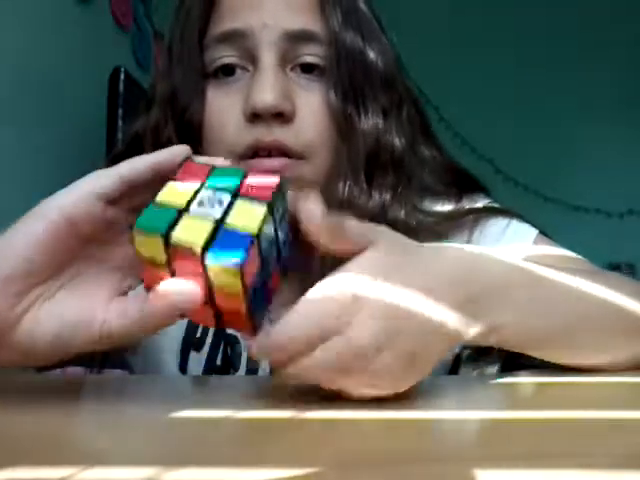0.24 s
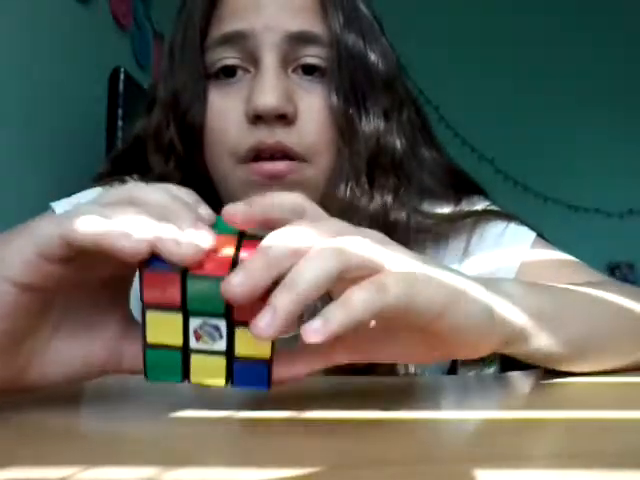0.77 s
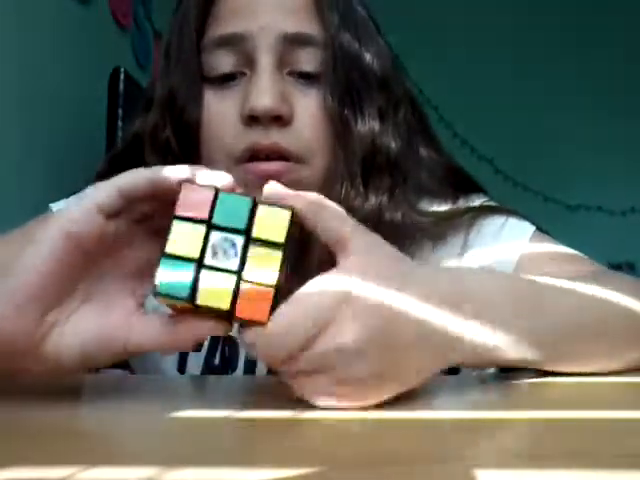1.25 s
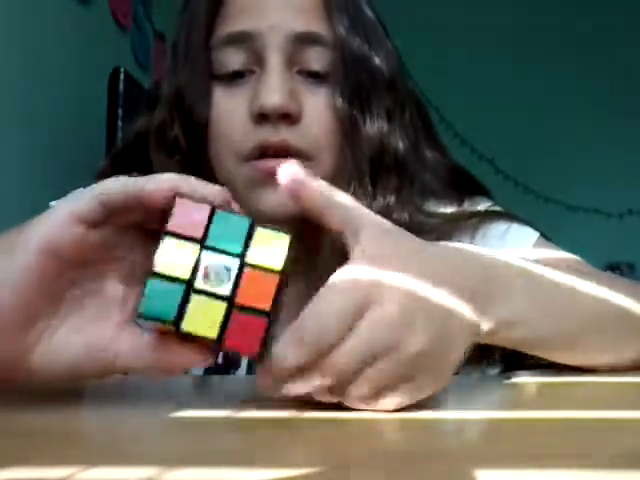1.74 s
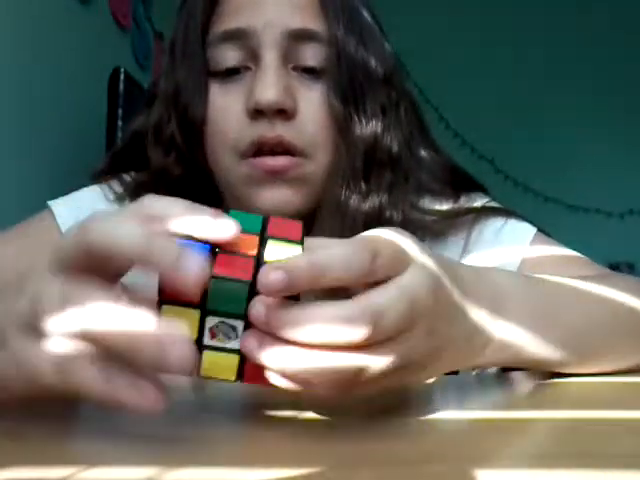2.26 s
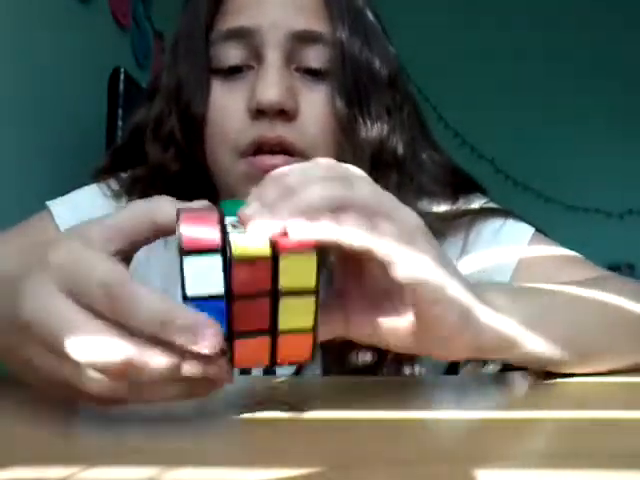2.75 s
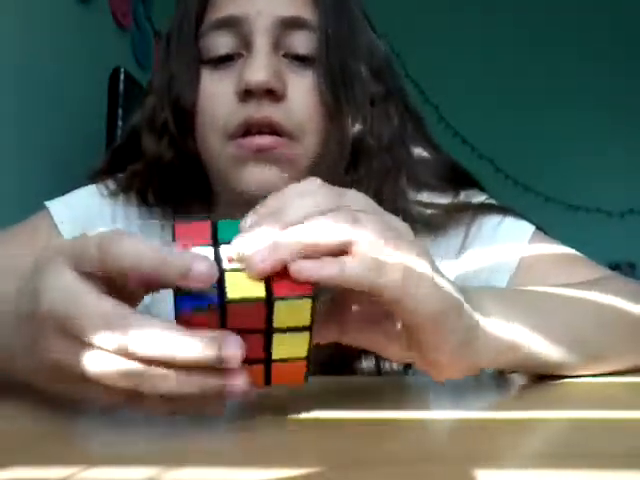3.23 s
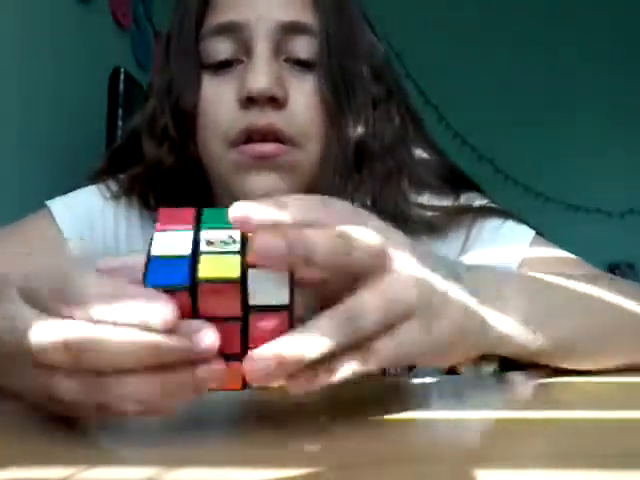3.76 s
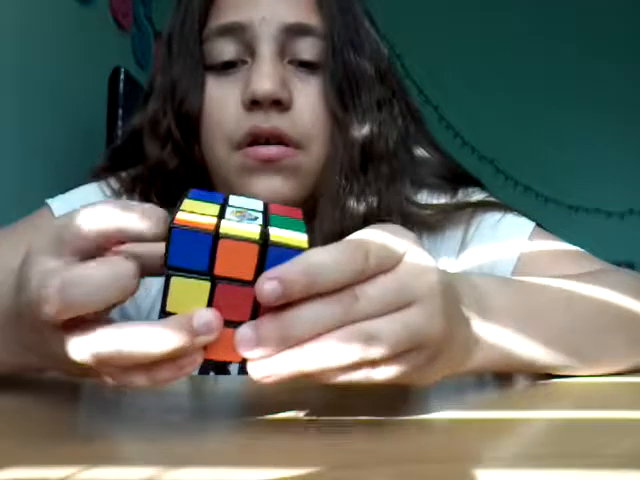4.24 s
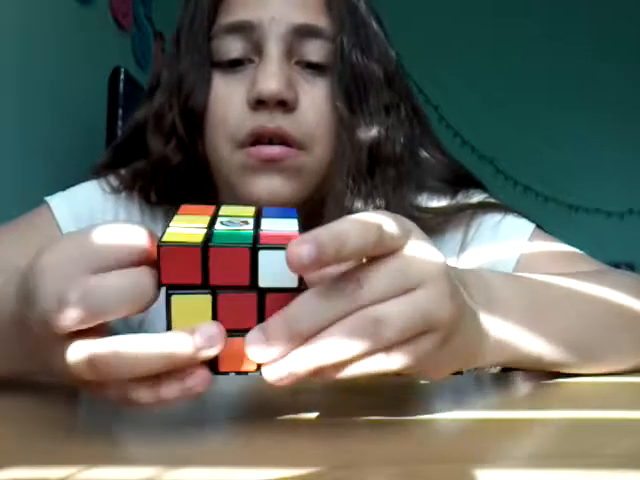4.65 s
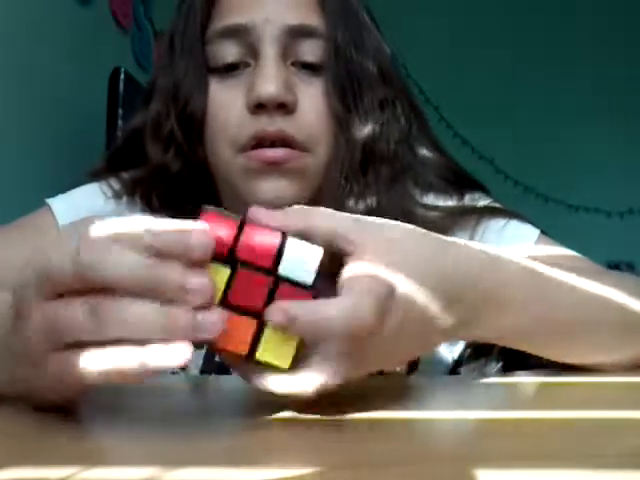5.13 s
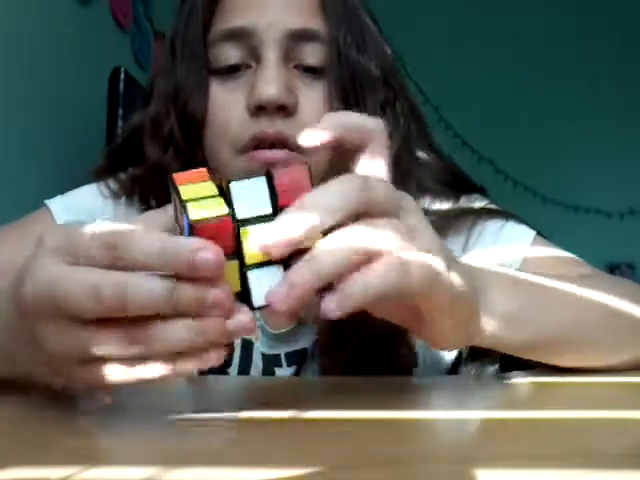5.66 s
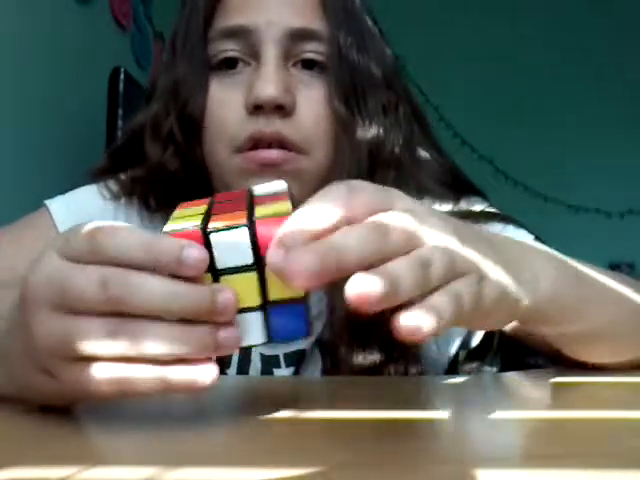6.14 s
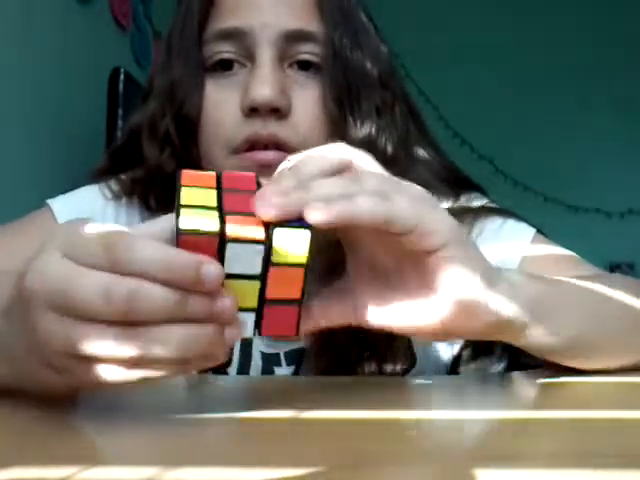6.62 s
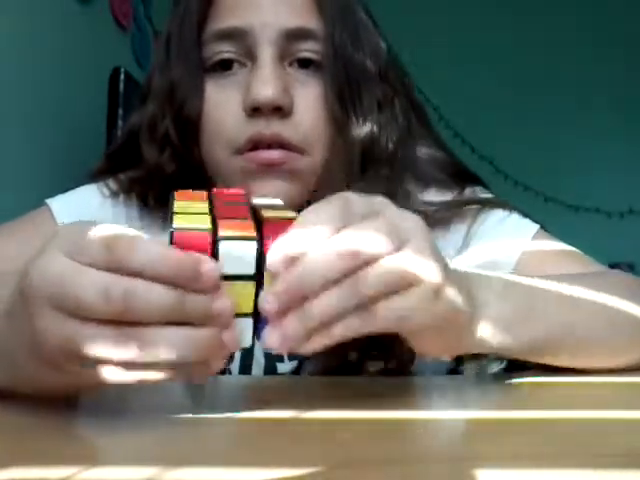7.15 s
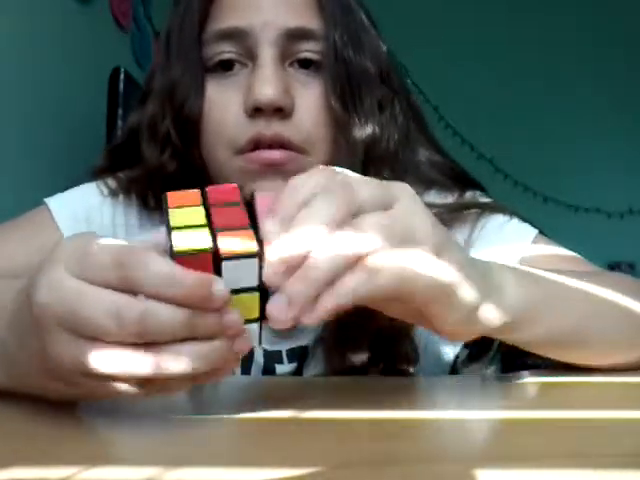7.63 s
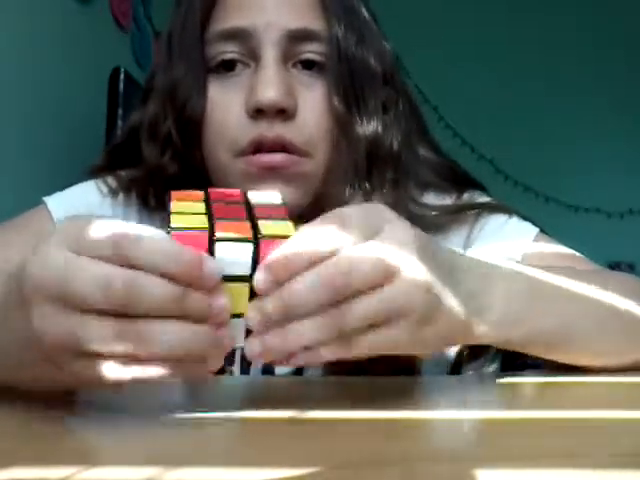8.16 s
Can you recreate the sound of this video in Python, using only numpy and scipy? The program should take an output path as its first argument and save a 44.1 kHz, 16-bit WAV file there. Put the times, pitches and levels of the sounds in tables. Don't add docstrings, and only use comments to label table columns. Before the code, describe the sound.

Close stereo microphone in a bare, lightly echoing room. A stiff plastic puzzle cube is turned by hand: brief dry scrapes end in bright cracks and hollow knocks, clustered irregularly with quiet gaps of tiny ticks and finger touches. A table thud comes early on, and one far louder clack lands at about five and a half seconds. Soft hum and hiss underneath.

```python
import sys
import numpy as np
from scipy import signal
from scipy.fft import rfft, irfft, next_fast_len
from scipy.io import wavfile
from scipy.ndimage import uniform_filter1d, minimum_filter1d, map_coordinates

SR = 44100
rng = np.random.default_rng(int(sys.argv[2]) if len(sys.argv) > 2 else 0)


def put_to_file(sound):
    columns = np.atleast_2d(sound).T
    safe = np.clip(columns, -1, 1)
    whole_steps = np.round(safe * 32767)
    wavfile.write(sys.argv[1], SR, whole_steps.astype(np.int16))


def gain_from_decibels(decibels):
    exponent = np.asarray(decibels, float) / 20
    return 10 ** exponent


N = 369999


def unit(x):
    return x / np.sqrt(np.mean(x ** 2) + 1e-20)


def along(points, hz):
    point_hz, value = np.transpose(points)
    return np.interp(np.log(hz + 1), np.log(point_hz + 1), value)


def filtered(x, response):
    size = next_fast_len(N + SR // 2)
    spectrum = rfft(x, size) * response(np.fft.rfftfreq(size, 1 / SR))
    return irfft(spectrum, size)[..., :N]


def causal(points):
    def response(hz):
        cepstrum = irfft(np.log(gain_from_decibels(along(points, hz))))
        half = len(cepstrum) // 2
        cepstrum[1:half] *= 2
        cepstrum[half + 1:] = 0
        log_response = rfft(cepstrum)
        return unit(np.abs(np.exp(log_response))) * np.exp(1j * log_response.imag)
    return response


def resonant(modes):
    def response(f):
        total = 0
        for k, (hz, width, db) in enumerate(modes):
            mode = 1j * f * width / (hz * hz - f * f + 1j * f * width)
            total = total + (-1) ** k * gain_from_decibels(db) * mode
        return total
    return response


def pair(shape, alike):
    a, b = rng.standard_normal((2, *shape))
    alike = np.clip(alike, 0, 1)
    return np.array([a, -alike * a + np.sqrt(1 - alike ** 2) * b])


def narrow(hz, width):
    return unit(filtered(rng.standard_normal(N), lambda f: np.exp(-((f - hz) / width) ** 2)))


# (time [s], crack [dB], hollow knock over the crack [dB], left over right [dB], decay T60 [s])
SEAT_SNAPS = [(0.1583, -23, -12, -8, 0.008), (0.8322, -22.5, -3.5, -3.5, 0.0091),
              (1.1391, -16.5, -3.5, -1, 0.045), (1.1439, -13, -1, -10, 0.0045),
              (1.2592, -23, -8, -6.5, 0.021), (1.2953, -17, 1.5, -2.5, 0.013),
              (1.2997, -14, -4, -9.5, 0.0073), (1.5234, -17.5, -9, 3.5, 0.012),
              (1.5471, -14.5, -1.5, 1, .016), (2.7533, -21.5, -6, 2, .007), (3.6489, -19, -10.5, -1, 0.013),
              (3.6601, -17.5, -2.5, -9, 0.012), (4.2188, -18, -3, 0.5, 0.031),
              (4.231, -11.5, -9, -7, 0.017), (4.2375, -17, -1.5, 1.5, 0.023),
              (4.6716, -20, -11, -5.5, 0.025), (4.6803, -15, 0.5, -6.5, 0.017),
              (5.5208, -22.5, -7, 0.5, 0.014), (5.5378, -9, -4.5, 1, 0.018), (5.5451, 1.5, -10, -3.5, .021),
              (6.5423, -29, -21, -9, .01), (6.5947, -16.5, -4, -3.5, 0.021), (7.0989, -28, -6, 3.5, 0.01),
              (8.323, -9.5, -11, -1.5, 0.01)]
# (time [s], crack [dB], knock over the crack [dB])
CATCH_SNAPS = [(0.073, -33, -6), (0.1634, -27, 6), (1.104, -29.5, -7), (1.1079, -22.5, -2),
               (1.217, -36.5, 11), (1.2301, -30.5, 2), (1.2658, -25, -34), (1.2778, -22.5, 3),
               (1.3923, -34, -44), (1.484, -35, 4.5), (1.516, -31, -6), (2.1975, -31.5, 4),
               (2.6348, -31.5, 1), (2.7268, -35.5, 3), (2.741, -34.5, -4), (2.7603, -21, -7),
               (2.7659, -34, 2), (3.5765, -24, -6.5), (3.6661, -19, -2.5), (4.2443, -17, 1.5),
               (4.6079, -25.5, -6), (5.5274, -26, 3.5), (5.5565, -26.5, -6.5), (5.5705, -24, 1),
               (5.9519, -33.5, 1.5), (6.5677, -22.5, -16), (6.584, -29, -3), (6.604, -21.5, -14),
               (7.129, -28.5, -3.5), (8.344, -35.5, 6.5)]
# (time [s], crack [dB], knock over the crack [dB])
LOOSE_TICKS = [(0.3035, -48.5, 3), (0.405, -40, -4), (0.5111, -50, 4), (0.9944, -42.5, 2),
               (1.4022, -33, -10), (1.6333, -39.5, 2.5), (1.6634, -47.5, 8), (2.0576, -45, -2),
               (2.5954, -44, -6), (2.612, -48, -6), (3.3387, -45.5, -2), (3.5606, -32.5, 2.5),
               (3.6091, -32, -3), (3.7297, -39, -5), (3.9344, -40, -0.5), (4.1231, -39.5, -2.5),
               (4.2045, -36, -4.5), (4.5958, -36.5, -2.5), (4.9538, -38.5, -2), (5.1574, -48.5, 8.5),
               (5.2064, -37.5, -2), (5.2395, -40.5, 5.5), (5.4194, -46.5, -18), (5.9579, -38, 11),
               (5.9145, -44.5, -6), (6.2971, -41, -1.5), (6.746, -42, 4.5), (7.1446, -34, -8),
               (8.173, -35, -12), (8.1978, -38, 8)]
# (time [s], crack [dB])
FINGER_TOUCHES = [(0.339, -51.5), (2.289, -47.5), (2.4514, -53), (3.871, -49), (3.924, -53.5), (4.536, -51),
                  (5.008, -52.5), (5.8531, -47), (7.2113, -44), (7.7286, -55), (7.8523, -66), (8.155, -60)]


def contacts():
    catch_t60_s, tick_t60_s = 0.011, 0.02
    chatter_db, chatter_spread_db = 1.5, 6
    tick_knock_db, knock_scatter_db, touch_knock_db = 4.5, 6, -0.5
    cube_pan_db, pan_scatter_db = -3.5, -2

    light = []
    for (s, rise, db), chances in zip(TURN_STROKES, rng.uniform(size=(len(TURN_STROKES), 3, 2))):
        for place, strength in chances:
            at = max(s - rise + place * (rise + TURN_FALL_S), 0)
            crack_db = db + chatter_db - chatter_spread_db * np.log(1 / strength)
            light.append((at, crack_db, tick_knock_db + knock_scatter_db * rng.standard_normal()))
    light += [(s, db, touch_knock_db) for s, db in FINGER_TOUCHES]

    small = [(row, catch_t60_s) for row in CATCH_SNAPS]
    small += [(row, tick_t60_s) for row in list(LOOSE_TICKS) + light]
    side_db = cube_pan_db + pan_scatter_db * rng.standard_normal(len(small))
    return list(SEAT_SNAPS) + [(*row, pan_db, t60) for (row, t60), pan_db in zip(small, side_db)]


def bursts(s, level_db, pan_db, life, alike, colour):
    t = np.arange(SR // 25) / SR
    decay = gain_from_decibels(-60 * (t / np.clip(life, .003, .08)[:, None]) ** 1.2)
    shape = decay * (1 - np.exp(-t / 0.00025))
    rows = pair(shape.shape, alike) * shape

    weight = unit(gain_from_decibels(along(colour, np.fft.rfftfreq(len(t), 1 / SR))))
    heard = np.sqrt(np.mean(np.abs(rfft(rows) * weight) ** 2, axis=2))
    early_rms = np.sqrt(np.mean(shape[:, :SR // 330] ** 2, axis=1))
    size = np.linalg.norm(shape, axis=1) / early_rms
    port_gain = gain_from_decibels(level_db + np.outer([.5, -.5], pan_db))
    rows = rows * (size / heard * port_gain)[..., None]
    impulse = (size * gain_from_decibels(level_db))[:, None] * (t == 0)

    at = (np.round(s * SR)[:, None] + np.arange(len(t))).astype(int).ravel()
    return np.array([np.bincount(at, r.ravel(), N + SR)[:N] for r in (*rows, impulse)])


def snaps():
    s, crack_db, knock_db, pan_db, t60 = np.transpose(contacts())
    crack = bursts(s, crack_db - 5.5, pan_db, t60, alike=0.1, colour=CRACK_COLOUR)
    knock = bursts(s, crack_db + knock_db - 7.5, pan_db, 2.8 * t60, alike=0.7, colour=KNOCK_COLOUR)
    return np.array([crack, knock])


# (time of most force [s], rise [s], scrape [dB])
TURN_STROKES = [(0.0, .01, -47.5), (0.071, 0.022, -47.5), (1.112, 0.022, -37.5), (1.226, .015, -56),
                (1.266, 0.028, -35), (1.402, .015, -44.5), (1.501, 0.024, -40.5), (2.653, 0.027, -44),
                (2.769, 0.044, -36), (2.951, 0.029, -47.5), (3.568, 0.016, -47), (3.634, 0.022, -43),
                (4.214, 0.016, -40), (4.6, .012, -46.5), (4.651, 0.019, -40.5), (5.532, 0.011, -26),
                (5.94, 0.037, -48.5), (6.553, 0.015, -38), (6.584, .01, -38.5), (7.12, 0.028, -40),
                (7.746, 0.028, -47), (8.182, 0.031, -47.5)]
TURN_FALL_S = 0.028
# (time of most force [s], rise [s], scrape [dB])
REGRIP_STROKES = [(.032, .02, -53.5), (.13, .02, -47.5), (.4, .015, -50.5), (.99, .015, -55.5),
                  (1.04, .01, -54.5), (1.7, .027, -55), (1.75, .02, -59), (1.871, .019, -59),
                  (2.33, .03, -64.5), (3.001, .01, -54.5), (3.339, .015, -60.5), (3.87, .015, -61),
                  (4.18, .02, -55), (5.232, .02, -53), (5.319, .03, -59), (5.505, 0.015, -56),
                  (6.74, .023, -57), (7.205, .017, -60), (7.292, .03, -53.5), (7.41, .03, -57.5),
                  (7.87, .03, -54), (8.28, .01, -54)]


def drag():
    strokes = [(s, rise, TURN_FALL_S, db) for s, rise, db in TURN_STROKES]
    strokes += [(s, rise, 1.5 * rise, db) for s, rise, db in REGRIP_STROKES]
    t = np.arange(N // 32 + 2) * 32 / SR
    force = 0
    for s, rise, fall, db in strokes:
        force = force + gain_from_decibels(db) * np.exp(-((t - s) / np.where(t < s, rise, fall)) ** 2)

    clumps = map_coordinates(rng.standard_normal(N // 120 + 4), [np.arange(N) / 120])
    grain = unit(gain_from_decibels(3.6 * clumps + 2.2 * rng.standard_normal(N)))
    slips = np.repeat(force, 32)[:N] * grain * gain_from_decibels([[-1.5], [1.5], [0]])
    crack = slips * pair((N,), 0.17)[[0, 1, 0]]
    knock = gain_from_decibels(-3.5) * slips * pair((N,), 0.56)[[0, 1, 0]]
    return np.array([crack, knock])


# (frequency [Hz], level [dB])
CRACK_COLOUR = [(1500, -26), (2600, -3.5), (4100, -4), (4800, -4), (5700, -1.5), (6750, -5.5), (7800, -9.5),
                (8600, -14), (10000, -20), (13000, -22.5), (15100, -34)]
# (frequency [Hz], level [dB])
KNOCK_COLOUR = [(100, -46), (400, -11.5), (700, -13), (890, 0.5), (1020, -0.5), (1150, -0.5), (1600, 0),
                (2200, 1), (2800, -11.5), (4000, -43.5)]


def plastic(crack, knock):
    return filtered(crack, causal(CRACK_COLOUR)) + filtered(knock, causal(KNOCK_COLOUR))


# (time [s], frequency [Hz], level [dB], decay T60 [s])
CORE_RINGS = [(0.161, 1150, -44, 0.15), (1.146, 873, -39, 0.23), (1.548, 900, -32.5, 0.2),
              (2.755, 906, -41, 0.29), (3.667, 950, -30.5, 0.14), (4.239, 1170, -37, 0.18),
              (4.6, 930, -44, 0.14), (4.682, 1000, -29.5, 0.12), (4.7, 1050, -38.5, 0.3),
              (5.549, 1170, -31.5, 0.37), (5.547, 1790, -28, 0.45), (6.603, 980, -33.5, 0.14),
              (8.198, 845, -50.5, 0.24)]


def hollow():
    out = np.zeros((2, N + SR))
    t = np.arange(SR // 3) / SR
    for s, hz, db, t60 in CORE_RINGS:
        band = signal.lfilter(*signal.iirpeak(hz, hz / 120, SR), pair(t.shape, 0.33))
        envelope = gain_from_decibels(db - 60 * t / t60) * (1 - np.exp(-t / 0.0013))
        out[:, round(s * SR):][:, :len(t)] += envelope * unit(band)
    return out[:, :N]


# (time [s], peak level [dB])
TABLE_BUMPS = [
    (.395, -39.5),
    (2.1965, -19),
    (2.201, -54),
    (2.216, -29),
    (2.226, -40),
    (5.545, -21),
]
# (frequency [Hz], width [Hz], level [dB])
TABLE_MODES = [(335, 51, 2.5), (433.5, 82, -1), (528, 52, 6.5), (800, 70, -8.5)]


def bumps():
    push = np.zeros(N)
    for s, db in TABLE_BUMPS:
        push[round(s * SR)] = gain_from_decibels(db + 30.5)
    thud = filtered(push, resonant(TABLE_MODES))
    return np.array([thud, -.6 * np.roll(thud, 25)])


# (time [s], level [dB])
TABLE_JOLTS = [
    (1.301, -64),
    (4.679, -57),
    (5.545, -52.5),
]


def jolts():
    out = np.zeros((2, N + SR))
    t = np.arange(SR // 4) / SR
    lowpass = signal.butter(2, 70, fs=SR)
    for s, db in TABLE_JOLTS:
        low = signal.lfilter(*lowpass, pair((2 * len(t),), -.5))[:, len(t):]
        envelope = gain_from_decibels(db - 60 * t / 0.15) * (1 - np.exp(-t / 0.0052))
        out[:, round(s * SR):][:, :len(t)] += envelope * unit(low)
    return out[:, :N]


# (frequency [Hz], T60 [s])
ROOM_T60 = [(300, .5), (1100, 0.46), (1850, 0.44), (3000, 0.33), (5800, 0.39), (9000, .25), (14000, 0.43)]
# (frequency [Hz], level [dB])
ROOM_TINT = [(300, 3), (850, -2), (1130, 0), (1420, -2.5), (1850, -0.5), (2500, -3), (4000, 1),
             (5900, -0.5), (9000, 5), (14000, 1.5)]


def room(x, block=SR // 3):
    out = np.zeros((2, N + 2 * SR))
    for a in range(0, N, block):
        hz, t, z = signal.stft(pair((SR * 2 // 3,), 0.067), SR, nperseg=256)
        decay_db = 60 * t / along(ROOM_T60, hz)[:, None]
        gain = gain_from_decibels(along(ROOM_TINT, hz)[:, None] - decay_db)
        tail = signal.istft(z * gain, SR, nperseg=256)[1]
        wet = signal.fftconvolve(x[None, a:a + block], tail / np.linalg.norm(tail[0]), axes=1)
        start = a + 250
        out[:, start:start + wet.shape[1]] += wet
    return out[:, :N]


# (frequency [Hz], width [Hz], level [dB])
PORT_MODES = [(5805, 480, 0.5)]
# (frequency [Hz], left over right [dB])
PORT_LEAN = [(300, 3), (700, 0), (4500, 0), (8000, 4.5), (14000, 8.5)]


def ports(x):
    def response(f):
        cavity = 1 + np.array([[.1], [1.6]]) * resonant(PORT_MODES)(f)
        return cavity * gain_from_decibels(np.outer([.5, -.5], along(PORT_LEAN, f)))
    return filtered(x, response)


# (frequency [Hz], level [dB per Hz])
MID_NOISE = [(15, -43), (25, -18), (118, -7), (207, -7.5), (244, -6), (405, -11.5), (544, -14.5),
             (1010, -19.5), (1280, -22), (13900, -28), (15100, -32)]
# (frequency [Hz], level [dB per Hz])
SIDE_NOISE = [(15, -55), (25, -26), (125, -2.5), (280, -17), (550, -19.5), (1000, -28.5), (2500, -34),
              (6000, -36), (13900, -37.5), (15100, -42.5)]
# (frequency [Hz], width [Hz], level [dB])
HUM_BANDS = [
    (92, 6, -69),
    (128, 14, -65.5),
    (255, 41, -62.5),
    (364.6, 15, -69),
]
# (start [s], end [s], frequency [Hz], width [Hz], level [dB])
FAR_WHINES = [
    (.46, .58, 830, 10, -73),
    (.64, .77, 830, 8, -74),
    (.5, .72, 415, 12, -76),
    (.63, .76, 1240, 10, -79),
    (7.97, 8.2, 3450, 200, -75),
]


def background():
    mid = gain_from_decibels(-61.5) * unit(filtered(rng.standard_normal(N), lambda f: gain_from_decibels(along(MID_NOISE, f))))
    side = gain_from_decibels(-55.5) * unit(filtered(rng.standard_normal(N), lambda f: gain_from_decibels(along(SIDE_NOISE, f))))
    for hz, width, db in HUM_BANDS:
        side = side + gain_from_decibels(db) * narrow(hz, width)
    t = np.arange(N) / SR
    far = np.zeros(N)
    for start, end, hz, width, db in FAR_WHINES:
        swell = np.sin(np.pi * np.clip((t - start) / (end - start), 0, 1)) ** .5
        far += gain_from_decibels(db) * narrow(hz, width) * swell
    return np.array([mid + side + 1.3 * far, mid - side + far])


def scene():
    *cube, to_room = plastic(*(snaps() + drag()))
    table = bumps()
    echoes = gain_from_decibels(-9.5) * room(to_room + 0.52 * table[0])
    return ports(cube + table + echoes + hollow()) + background() + jolts()


def roll_off(x):
    return signal.sosfilt(signal.butter(12, 15210, fs=SR, output="sos"), x)


def record(dry):
    need = np.minimum(1, 1.02 / (np.abs(dry) + 1e-9))
    gain = uniform_filter1d(minimum_filter1d(need, size=31, axis=1), size=25, axis=1)
    top_hz = 14800
    mix = filtered(dry * gain, lambda f: 1 / (1 + (f / top_hz) ** 60))
    return roll_off(mix)


dry = scene()
out = record(dry)
put_to_file(out)
```